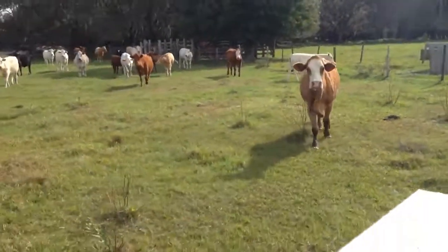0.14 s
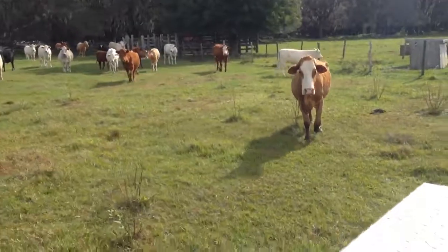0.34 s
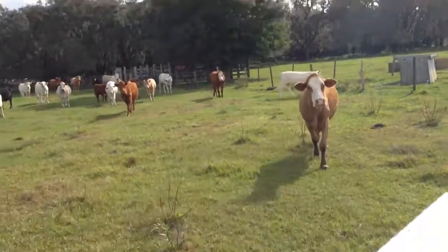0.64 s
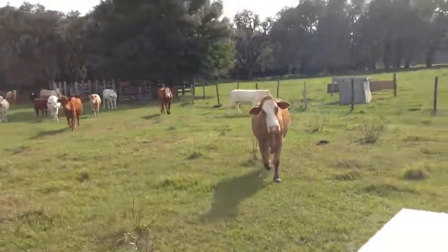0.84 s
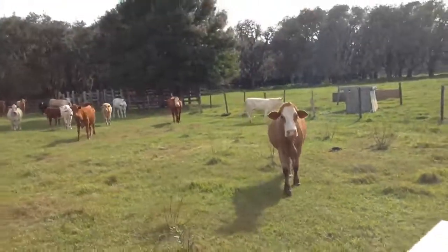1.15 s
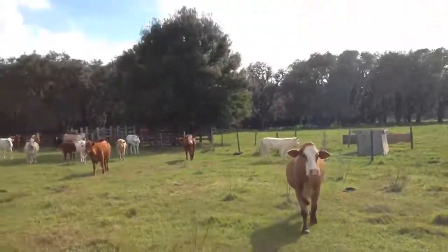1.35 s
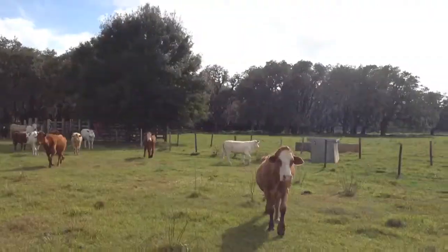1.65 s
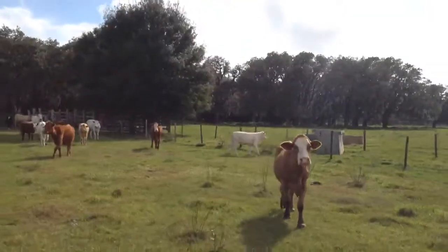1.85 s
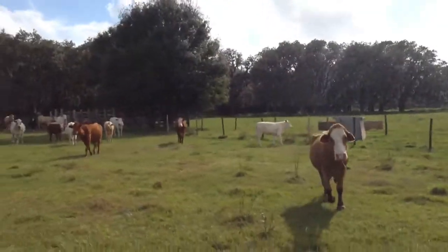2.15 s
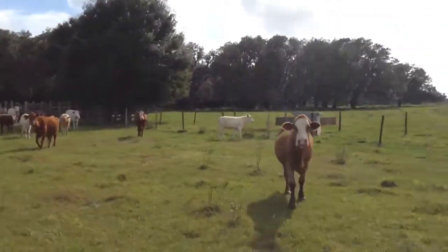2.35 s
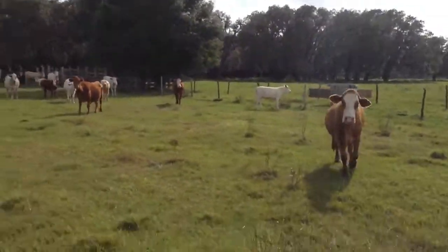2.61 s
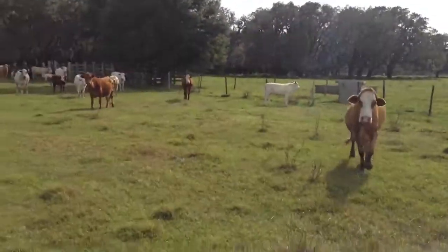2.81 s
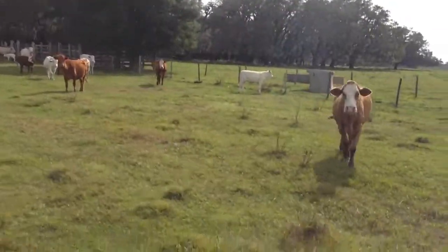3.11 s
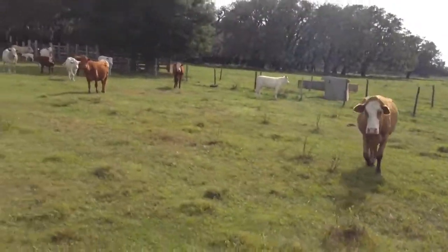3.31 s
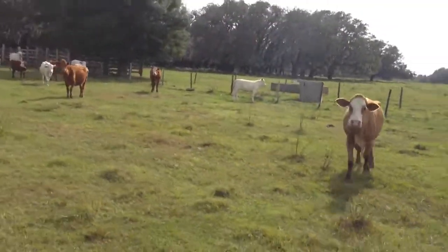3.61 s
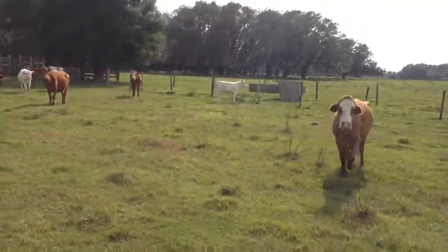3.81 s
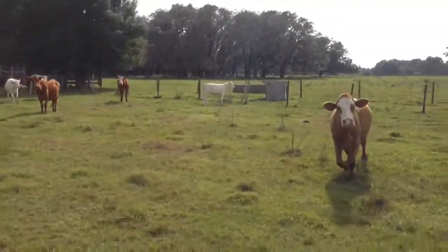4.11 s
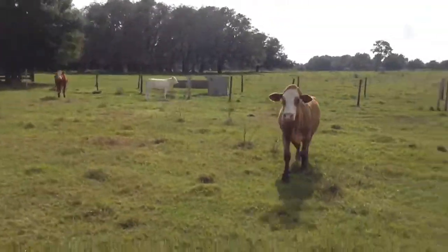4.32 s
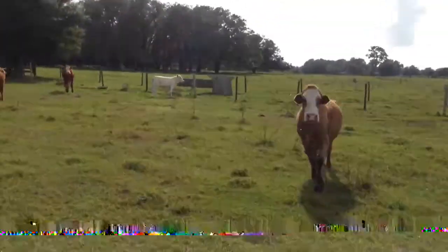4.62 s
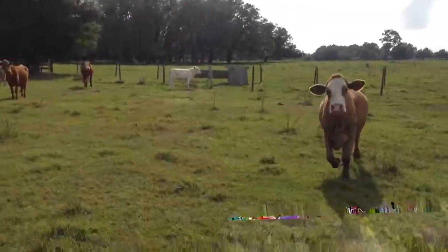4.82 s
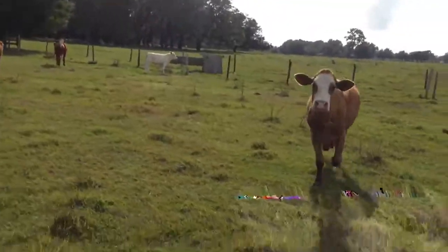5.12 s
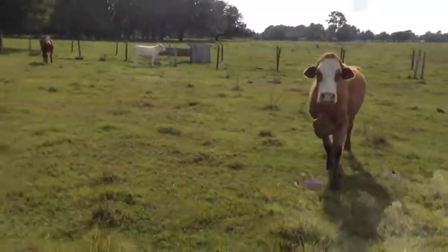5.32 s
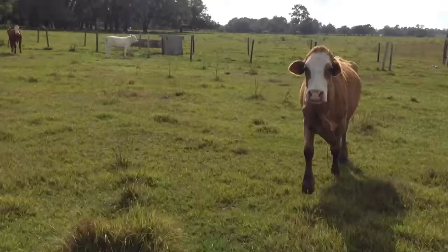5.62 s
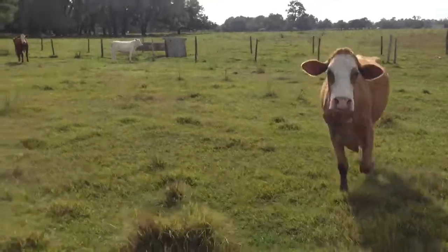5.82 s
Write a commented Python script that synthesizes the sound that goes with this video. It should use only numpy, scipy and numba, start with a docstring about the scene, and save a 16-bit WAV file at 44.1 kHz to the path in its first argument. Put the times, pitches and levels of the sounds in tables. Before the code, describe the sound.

Cattle moo close by in an open pasture, several calls overlapping, over low wind rumble, an idling engine and snapping stalks.

```python
"""Wind rumbles on a hand-held phone in open pasture; the grip shifts and stalks snap under hooves.
An engine idles somewhere behind, grass swishes, an insect sings high up. Cattle around the microphone
give five moos, three overlapping: vocal folds pulse through throat and mouth, and a tree line answers
faintly. Near the end come thin far notes, perhaps a bird, and one hard puff of wind."""
import sys
import numpy as np
from scipy import signal
from scipy.io import wavfile
from scipy.ndimage import uniform_filter1d
from numba import njit

SR = 44100
rng = np.random.default_rng(int(sys.argv[2]) if len(sys.argv) > 2 else 0)


def dump_mix(stems):
    """Bounce the given channels to the path in sys.argv[1] as a 16-bit WAV at rate SR."""
    frames = np.atleast_2d(stems).T  # one column per channel
    limited = np.clip(frames, -1, 1)  # hard clip at full scale
    pcm = np.round(limited * 32767).astype(np.int16)
    wavfile.write(sys.argv[1], SR, pcm)


N = 262395
T = np.arange(N) / SR


def undb(db):
    """Decibels to gain."""
    return 10 ** (np.asarray(db) / 20)


def unit(x):
    """Scale to rms 1."""
    return x / np.sqrt(np.mean(x ** 2))


@njit
def svf(x, hz, width):
    """Band-pass with a moving centre, gain 1 there."""
    y, band_state, low_state = np.empty(len(x)), 0., 0.
    for i in range(len(x)):
        g, damping = np.tan(np.pi * hz[i] / SR), width / hz[i]
        v = (band_state + g * (x[i] - low_state)) / (1 + g * (g + damping))
        band_state, low_state = 2 * v - band_state, low_state + 2 * g * v
        y[i] = damping * v
    return y


def band(x, hz, width_hz):
    """The band-pass applied twice, for steep skirts."""
    hz = np.clip(hz * np.ones(len(x)), 20, .45 * SR)
    return svf(svf(x + 1e-18, hz, float(width_hz)), hz, float(width_hz))


def noise(hz, width_hz):
    """A band of noise, rms 1."""
    return unit(band(rng.standard_normal(N), hz, width_hz))


def walk(rate):
    """Random levels held 1 / rate s and smoothed twice, rms 1."""
    hold = int(SR / rate)
    steps = np.repeat(rng.standard_normal(N // hold + 1), hold)
    return unit(uniform_filter1d(uniform_filter1d(steps, hold), hold)[:N])


def level(table):
    """Gain over the whole scene from rows of t/s, level/dB."""
    return undb(np.interp(T, *np.transpose(table)))


def read(table):
    """A timed table's span of samples, a fade at both ends, and its columns along that span."""
    times, *columns = np.transpose(table)
    span = slice(int(times[0] * SR), min(int(times[-1] * SR), N))
    t = T[span]
    fade = np.clip(np.minimum(t - times[0], times[-1] - t) / .02, 0, 1)
    return span, fade, [np.interp(t, times, column) for column in columns]


def friction_grains():
    """Rubbing: dense tiny grains of noise, very uneven in size."""
    return rng.standard_normal(N) * undb(1.6 * np.repeat(rng.exponential(size=N // 40 + 1), 40)[:N])


def engine_and_wind():
    """An engine hums behind while wind rumbles and buffets at the microphone; all waver together."""
    # engine hum plus wind rumble: t/s, level/dB
    rumble_curve = [(0.0, -30), (0.15, -36.5), (1.7, -40), (1.84, -34), (1.95, -44.5), (2.3, -38),
                    (2.54, -40), (3.1, -49), (4.3, -42), (4.6, -43.5), (5.3, -45), (5.7, -42), (5.95, -47)]
    # wind buffets: t/s, level/dB
    buffet_curve = [(0, -34), (.35, -56.5), (1.76, -50.5), (2.3, -46), (3.1, -43), (4.35, -45), (5.26, -46),
                    (5.95, -46.5)]
    hum = noise(71.53 * (1 + 0.018 * walk(2.33)), width_hz=7)
    rumble = unit(hum + noise(73.3, width_hz=79))
    waver = walk(6.95)
    buffets = level(buffet_curve) * undb(2 * waver) * noise(99, width_hz=382)
    return level(rumble_curve) * undb(1.5 * waver) * rumble + buffets


def whine():
    """A thin held tone above the rumble, dying away at the end."""
    # the whine's rise and fall: t/s, level/dB
    curve = [(0, -59.5), (1.5, -49.5), (2.3, -48.5), (4.4, -48), (4.9, -50.5), (5.95, -79)]
    return level(curve) * noise(243.9, width_hz=7.2)


def far_air():
    """Distant air and leaves, in half-octave bands that swell together and flicker alone."""
    # spectrum of the pasture: f/Hz, relative density/dB
    spectrum = [(88, -32), (150, 6), (244, -3), (333, -2.5), (552, 1), (621, -1), (2200, -10.5),
                (2890, -40.5), (8260, -26), (9840, -38), (10800, -54), (14500, -36), (15700, -44)]
    hz, db = np.transpose(spectrum)
    swell_db = 1.7 * walk(0.78)
    out = np.zeros(N)
    for centre in 200 * 2 ** np.arange(0, 6.4, .5):
        band_db = np.interp(np.log(centre), np.log(hz), db) + swell_db + 2.35 * walk(8)
        out += undb(band_db) * np.sqrt(centre) * noise(centre, centre / 2)
    return undb(-53) * unit(out)


def insect(song_hz=9850, throb_hz=67.5):
    """One insect sings a high narrow band that slides upward with each throb."""
    cycle = np.cumsum(throb_hz * (1 + .015 * walk(2))) / SR % 1
    song = noise(song_hz * (1 + 0.097 * (cycle - .5)), width_hz=700)
    throb = 2 + np.sin(np.pi * cycle) ** 2
    return unit(song * throb) * undb(-68.5 + 1.5 * walk(1.74))


def soft_hisses(grains):
    """Grass stirring and brushed, and a faint breathy hiss during the second moo."""
    # swells of hiss: centre t/s, level/dB, length/s
    hisses = [(0.048, -34, 0.011), (0.638, -63, 0.043), (1.016, -68, 0.17), (1.197, -69, 0.085),
              (1.795, -70, 0.036), (2.748, -73, 0.3), (3.39, -66, 0.19), (3.58, -68, 0.16),
              (3.815, -70, 0.19), (4.061, -56, 0.051), (4.167, -65, 0.17), (4.386, -57, 0.03),
              (4.421, -55.5, 0.04), (4.495, -60.5, 0.11), (4.691, -62, 0.022), (4.85, -68, 0.071),
              (5.029, -59.5, 0.1), (5.192, -60, 0.056), (5.416, -48, 0.017), (5.525, -58.5, 0.14),
              (5.727, -69, 0.068), (5.834, -58.5, 0.17)]
    bright = unit(band(grains, 11770, 19700)) + undb(2.5) * unit(band(grains, 4520, 14000))
    swells = sum(undb(db) * np.exp(-((T - at) / (0.38 * length)) ** 2) for at, db, length in hisses)
    stir = undb(-69 + 2.5 * walk(12))
    return (swells + stir) * bright


def handling(grains):
    """Hand and cloth rub on the phone, right at the microphone."""
    # the shifting grip: t/s, level/dB
    grip = [(0.0, -99), (0.04, -46), (0.054, -27), (0.07, -37), (0.1, -53.5), (0.286, -45), (0.34, -56),
            (0.382, -46.5), (0.65, -59)]
    span, fade, (db,) = read(grip)
    rub = unit(band(grains, 490, 1800))
    body = undb(-5) * unit(band(grains, 233, 165))
    scratch = undb(-15) * unit(band(grains, 1800, 8900))
    out = np.zeros(N)
    out[span] = fade * undb(db) * (rub + body + scratch)[span]
    return out


def snaps(t60_s=0.098, rise_s=0.00087):
    """Stalks and twigs break under hooves: a wide crack, a short ring and a duller thud."""
    # breaks: t/s, crack and ring gain/dB, ring f/Hz, thud gain/dB
    breaks = [(0.0115, -44, 2630, -20.5), (0.0451, -33, 5000, -16.5), (0.053, -43, 3130, -31),
              (0.112, -43, 2630, -44), (0.169, -50, 5000, -43), (0.208, -40.5, 3220, -34),
              (0.278, -47, 4400, -40), (0.353, -49, 3970, -33), (0.381, -45, 5950, -25),
              (0.503, -50.5, 4960, -32.5), (1.092, -48, 3330, -28), (1.983, -50.5, 6000, -42),
              (2.475, -32.5, 3300, -13), (2.6864, -39, 3260, -20), (3.2023, -43, 3430, -40),
              (4.3075, -43.5, 2740, -32), (4.333, -46, 2820, -40), (4.525, -43, 2720, -25),
              (4.6739, -49, 2590, -43), (4.807, -48, 2820, -37), (4.878, -49, 3100, -38),
              (5.309, -48.5, 3270, -38), (5.415, -37, 2920, -24.5), (5.4816, -51, 4320, -38),
              (5.5253, -40.5, 3400, -18.5), (5.577, -49, 3790, -47), (5.586, -43, 4080, -50)]
    t = T[:6000]
    envelope = np.exp(-np.log(1000) * t / t60_s) * (1 - np.exp(-t / rise_s))
    out = np.zeros(N + len(t))
    for at, db, hz, thud_db in breaks:
        burst = rng.standard_normal(len(t)) * envelope
        crack = undb(-2) * band(burst, 2600, 9600)
        ring = 1.22 * band(burst, hz, hz / 2) + 2.2 * band(burst, hz, hz / 14)
        thud = band(burst, 1525, 460) - band(burst, 2126, 460)
        out[int(at * SR):][:len(t)] += undb(db) * (crack + ring) + undb(thud_db) * thud
    return out[:N]


def vocal_folds(hz, span, held_rough, edge_rough=0.566, start_s=0.088, stop_s=0.12):
    """Voice and breath at the folds, which are slack and rough as a call starts and stops."""
    t = T[:len(hz)]
    edges = np.maximum(np.exp(-(t / start_s) ** 2), np.exp(-(t[::-1] / stop_s) ** 2))
    rough = np.clip(held_rough + max(edge_rough - held_rough, 0) * edges, 0, 1)
    jitter = 1 + .028 * rough ** 2 * walk(60)[span]
    phase = 2 * np.pi * np.cumsum(hz * jitter) / SR + 1e-6
    partials = 13000 // hz.max()
    pulses = (np.sin((partials + .5) * phase) / np.sin(phase / 2) - 1) / np.sqrt(2)  # equal partials
    breath = rng.standard_normal(len(hz)) * (1 + np.cos(phase)) * np.sqrt(SR / 3 / hz)  # a puff a cycle
    shimmer = undb(4 * rough * walk(50)[span])
    return pulses * shimmer + .95 * rough * breath, breath, phase


def moo(curve, chest_partial, held_rough, throat, notch_hz, rasp_hz=2700):
    """The folds drive throat and mouth; the chest sings one low partial cleanly."""
    span, fade, (hz, chest_db, mouth_db, opening, rasp_db) = read(curve)
    voice, breath, phase = vocal_folds(hz, span, held_rough)
    shift = 1 + opening / 100
    knots = np.arange(0, len(hz) + SR // 9, SR // 9)
    mouth = np.zeros(len(hz))
    for k, (centre, width, db) in enumerate(throat):
        # the soft throat never holds its shape
        waver = np.interp(np.arange(len(hz)), knots, rng.standard_normal(len(knots)))
        gain = undb(db + (rasp_db + 3 * waver if centre > rasp_hz else 2 * waver))
        turbulence = (centre / 8500) ** 2 * breath
        mouth += (-1) ** k * gain * band(voice + turbulence, centre * shift, width)
    mouth -= svf(mouth, notch_hz * shift, 200.)  # a narrow dip in the spectrum
    chest = np.sqrt(2) * np.sin(chest_partial * phase)
    out = np.zeros(N)
    out[span] = fade * (undb(mouth_db) * mouth + undb(chest_db) * chest)
    return out


def herd():
    """Five moos around the microphone, and a thin creak that leads into the second."""
    # a curve per call, the creak last: t/s, pitch f/Hz, chest level/dB, mouth gain/dB,
    # mouth opening as resonance shift/%, extra gain of the rasping treble/dB
    curves = [
        [(0.78, 116.7, -45, -70, 7, -3), (0.83, 118.6, -48, -58.5, 3, -9), (0.86, 123.1, -41, -52, 2, -7),
         (0.92, 125.4, -39.5, -47.5, 1, 1), (1.0, 127.7, -38, -44, -1.5, 0.5), (1.18, 130, -38, -42, 0, 0),
         (1.27, 129.2, -37.5, -42, -.5, 2.5), (1.305, 123.7, -37, -45.5, -0.5, 3),
         (1.33, 106, -39.5, -49, 3, 5), (1.35, 96, -53, -62, -3, -3), (1.37, 92.1, -64, -80, -9, -6)],
        [(2.11, 102.4, -68, -65, 9, -8), (2.15, 108.1, -47, -49, 5.5, -3), (2.21, 118.8, -64, -41.5, 4, -5),
         (2.27, 129.1, -42, -40.5, 5, -3), (2.36, 136.1, -37.5, -38, 1.5, -3), (2.55, 142.7, -36, -37, 1.5, -5),
         (2.75, 152, -26, -44, 0.5, 8.5), (2.9, 154.6, -27, -42, 3, 4), (3.1, 157.2, -28.5, -46, 0.5, 5.5),
         (3.3, 159.5, -26, -44.5, -2, 6), (3.42, 156.3, -29.5, -45, -1.5, 3.5), (3.47, 141.3, -31, -44, 5, -4),
         (3.53, 130.6, -75, -60, -1, -8)],
        [(2.62, 81.4, -53, -51, -3, -4), (2.75, 87.75, -46, -42, 1.5, 4), (2.88, 94.6, -34, -48, 0.5, 5),
         (2.93, 97.7, -39, -42, -2, 3), (3.04, 103.8, -51, -38.5, -3, 1.5), (3.2, 106.6, -65, -37.5, -2.5, 5),
         (3.45, 108.4, -40.5, -36, -2, 5), (3.61, 107.3, -44.5, -38.5, -2, 3), (3.73, 102.1, -39, -39, -1, 0),
         (3.8, 90.6, -39, -57, -11, -3)],
        [(2.91, 99, -68, -57, 8, -6), (3.0, 105.5, -54, -45, 3, 3), (3.158, 114.1, -37, -47.5, -0.5, 8),
         (3.3, 114.3, -37, -42, -1.5, 3.5), (3.55, 116, -37.5, -39.5, 2, 3), (3.8, 117.1, -37, -36, 1.5, 0),
         (4.1, 115.4, -39.5, -36, -.5, 1.5), (4.25, 112.2, -37.5, -39, 0.5, 1),
         (4.29, 103.7, -50, -45.5, 2.5, 0), (4.33, 98.8, -33, -54, -14, -6), (4.37, 94, -76, -70, -6, -4)],
        [(4.26, 229.3, -61, -55, 2.5, 0), (4.45, 220.4, -65, -54.5, 1.5, 0), (4.556, 216, -64, -53.5, 3, 0),
         (4.63, 205.7, -71, -61, 3, 0), (4.72, 204.5, -69, -74, -9, 0)],
        [(2.02, 91.1, -62, -64, 4.3, 0), (2.081, 96.6, -62, -54, 1.02, 0), (2.12, 99.7, -72, -50, 1.5, 6),
         (2.15, 108, -72, -44, .5, 0)],
    ]
    # per call, the partial that the chest sings: harmonic number
    chest_partials = [2, 2, 3, 2, 3, 2]
    # per call, the folds in mid-call: roughness/0-1
    held_rough = [.22, .14, .16, .15, .75, .5]
    # per call, throat and mouth resonances at half opening: f/Hz, width/Hz, gain/dB
    throats = [
        [(534, 96, -12), (830, 166, -3.5), (1092, 104, -2), (1497, 260, -1.5), (1689, 70, 1), (1913, 200, -1),
         (2400, 84, -9), (2840, 240, -17), (5700, 760, -36)],
        [(713, 60, -4.5), (1014, 1070, -18.5), (1160, 172, -1), (1446, 189, 4), (1880, 202, 1.5),
         (2194, 194, -1), (3520, 520, -27), (4390, 160, -27), (5700, 250, -32), (7360, 850, -31),
         (8100, 1500, -44), (9370, 3030, -37.5)],
        [(239, 82, -6.5), (644.8, 42, -6.5), (810, 310, -24), (993.4, 132, 0.5), (1286, 100, -2),
         (1670, 800, -13.5), (2120, 130, -8.5), (4030, 520, -36), (5410, 230, -34)],
        [(333, 36, -10.5), (629, 86.6, -7), (932, 208, -4), (1215, 161, 2), (1546, 171, -3), (1760, 200, 0.5),
         (2220, 202, -9.5), (2680, 390, -25), (4150, 670, -39), (4765, 224, -27), (5430, 840, -36.5),
         (6232, 190, -39)],
        [(689, 126, 2.5), (915, 330, 4), (1085, 220, 1), (1250, 520, 3), (1510, 510, -9)],
        [(1910, 410, -1)],
    ]
    # a narrow dip in each call's spectrum: f/Hz
    notch_hz = [3370, 2670, 2860, 3300, 1900, 2960]
    return sum(map(moo, curves, chest_partials, held_rough, throats, notch_hz))


def tree_line(calls, blur_s=0.0037):
    """The trees send the calls back dull and blurred."""
    # echoes: delay t/s, gain/dB
    echoes = [(.03, -24), (.25, -34)]
    blur = rng.standard_normal(4000) * np.exp(-T[:4000] / blur_s)
    dull = signal.fftconvolve(band(calls, 940, 4000), blur / np.linalg.norm(blur))[:N]
    return sum(undb(db) * np.pad(dull, (int(delay * SR), 0))[:N] for delay, db in echoes)


def ticks(decay_s=.0013):
    """Dry ticks close to the microphone, treble only."""
    # ticks: t/s, gain/dB
    events = [(.888, -41), (2.025, -52), (2.06, -54), (2.0817, -22.5), (5.634, -43)]
    t = T[:6000]
    out = np.zeros(N + len(t))
    for at, db in events:
        burst = rng.standard_normal(len(t)) * np.exp(-t / decay_s)
        out[int(at * SR):][:len(t)] += undb(db) * (band(burst, 6000, 2800) + band(burst, 10300, 10500))
    return out[:N]


def snort():
    """Air hisses through the nose as the second moo sets in."""
    # nasal hiss: t/s, level/dB
    hiss = [(2.09, -70), (2.125, -62), (2.145, -55), (2.235, -50), (2.27, -56), (2.4, -55.5), (2.46, -73),
            (2.6, -70)]
    span, fade, (db,) = read(hiss)
    out = np.zeros(N)
    out[span] = fade * undb(db) * (noise(3100, 6000) + undb(-4) * noise(11500, 12000))[span]
    return out


def far_call():
    """Thin tones far off, each in a halo of noise: perhaps a bird."""
    # two falling notes and one nearly level: t/s, f/Hz, level/dB
    notes = [
        [(5.71, 2620, -72), (5.79, 2400, -71), (5.86, 2120, -54)],
        [(5.81, 2080, -60), (5.87, 1800, -61)],
        [(5.86, 1984, -54.5), (5.97, 1930, -59)],
    ]
    out = np.zeros(N)
    for note in notes:
        span, fade, (hz, db) = read(note)
        halo = 0.65 * unit(band(rng.standard_normal(len(hz)), hz, 150))
        tone = np.sin(2 * np.pi * np.cumsum(hz) / SR)
        out[span] += fade * undb(db) * (tone + halo)
    return out


def gust(start_s=5.781, end_s=5.893, flap_hz=88, spread_octaves=0.53):
    """One hard puff of wind flaps unevenly at the microphone."""
    hz = flap_hz * 2 ** (spread_octaves * walk(60))
    flap = np.sin(2 * np.pi * np.cumsum(hz) / SR) + 0.37 * noise(187, 180)
    gate = np.clip(np.minimum(T - start_s, end_s - T) / .006, 0, 1)
    return undb(-30.5) * gate * flap


def scene():
    """The pasture as it reaches the one microphone."""
    calls = herd() + snort()
    cattle = calls + tree_line(calls)
    background = engine_and_wind() + whine() + far_air() + insect() + far_call()
    grains = friction_grains()
    close = soft_hisses(grains) + handling(grains) + snaps() + ticks() + gust()
    return (cattle + background + close)[None]


def record(dry):
    """The phone drops the deepest bass and cuts the top."""
    low_cut = signal.butter(2, 28, "high", fs=SR, output="sos")
    high_cut = signal.ellip(10, .2, 80, 15550, fs=SR, output="sos")
    return signal.sosfilt(high_cut, signal.sosfilt(low_cut, dry))


dry = scene()
out = record(dry)
dump_mix(out)
```